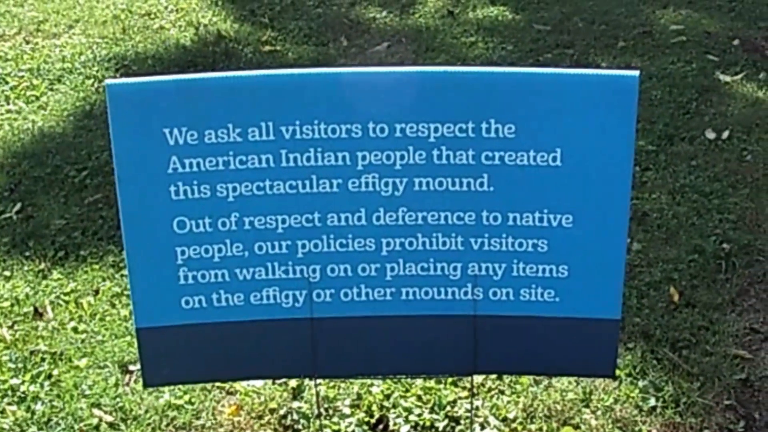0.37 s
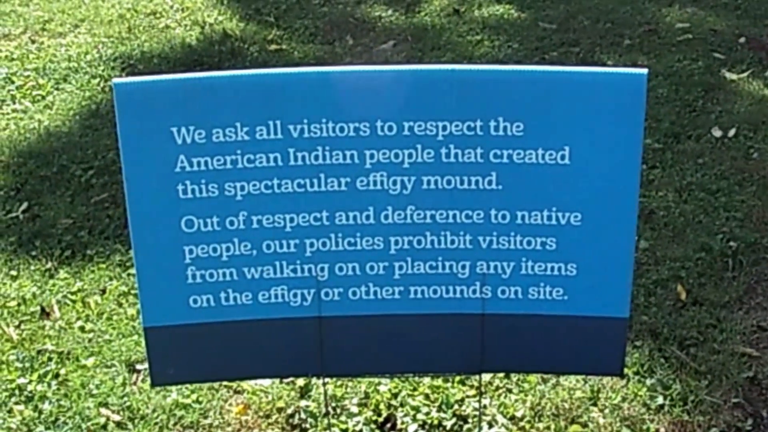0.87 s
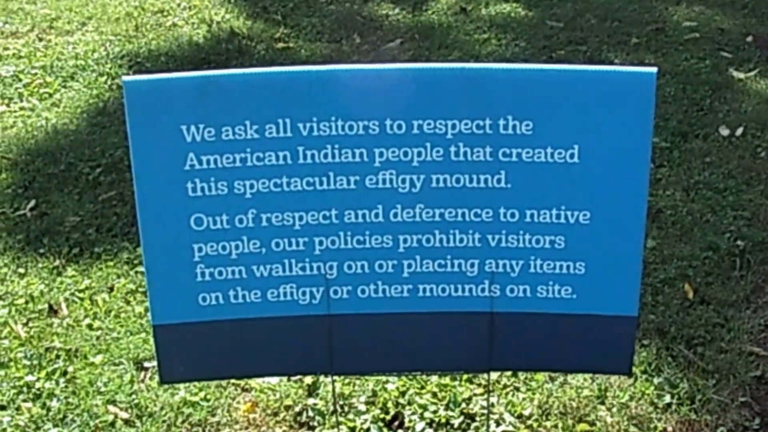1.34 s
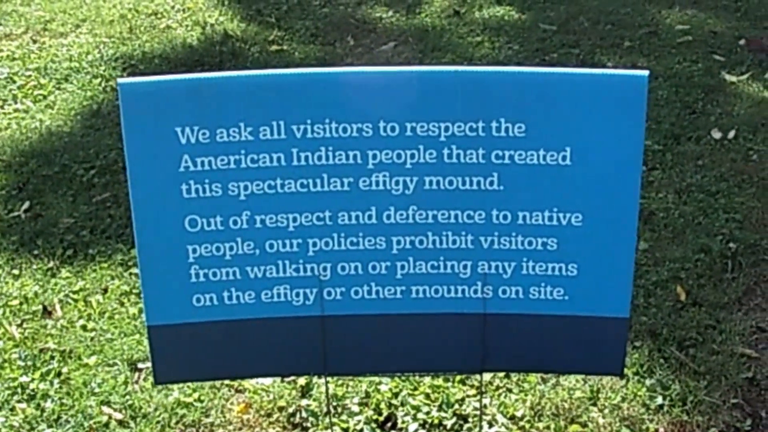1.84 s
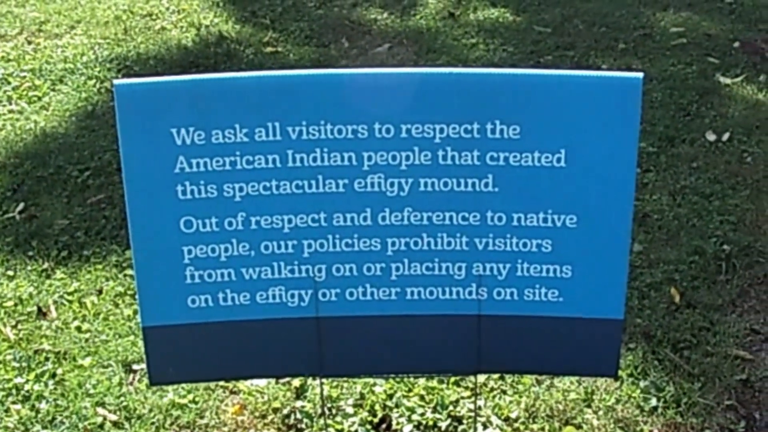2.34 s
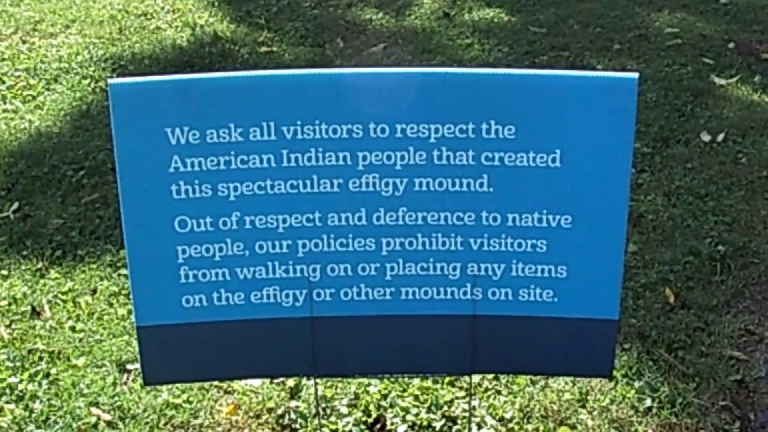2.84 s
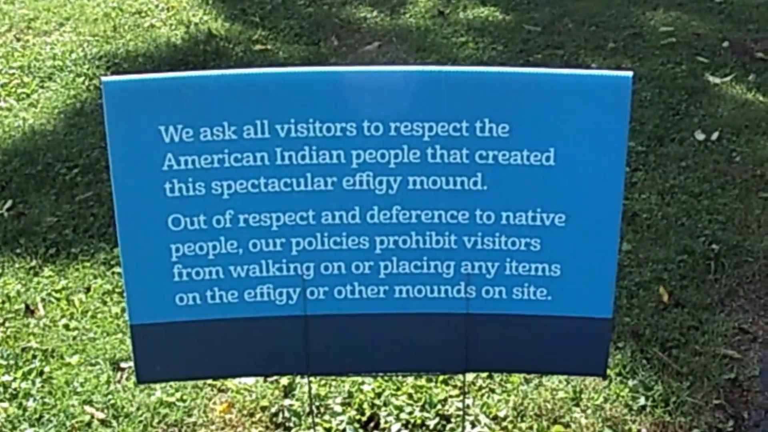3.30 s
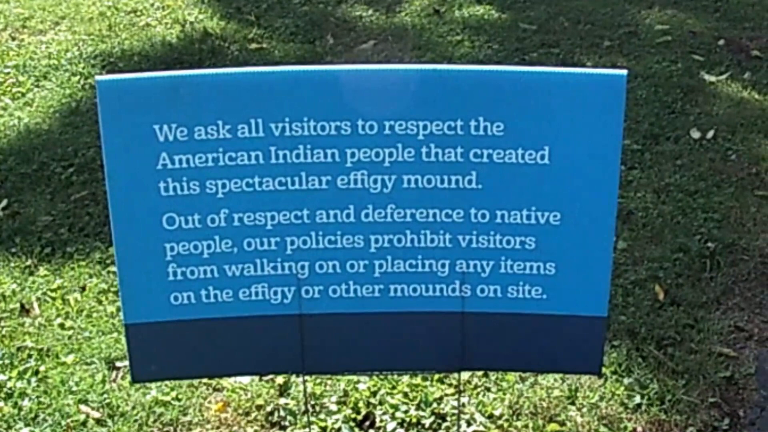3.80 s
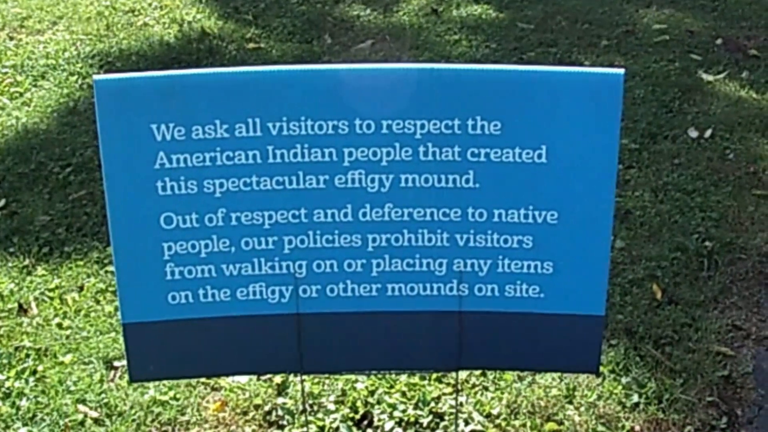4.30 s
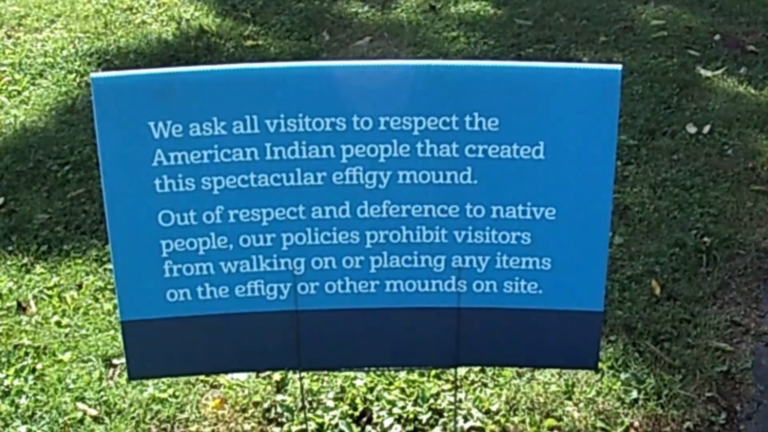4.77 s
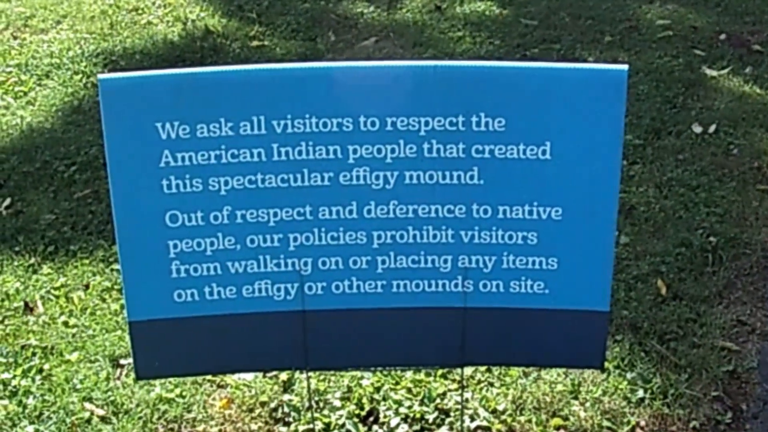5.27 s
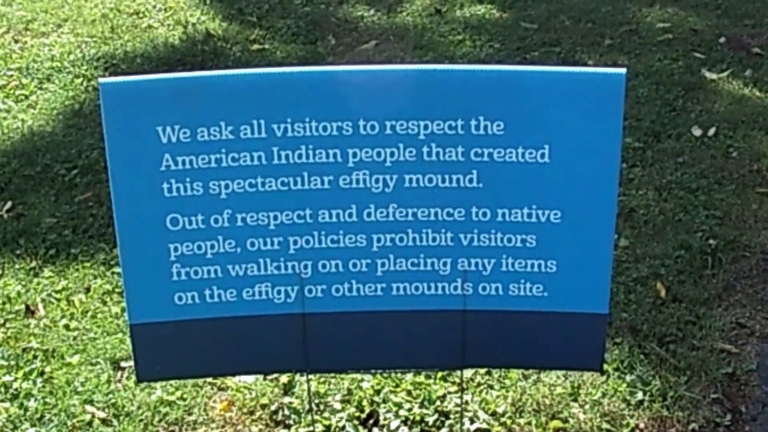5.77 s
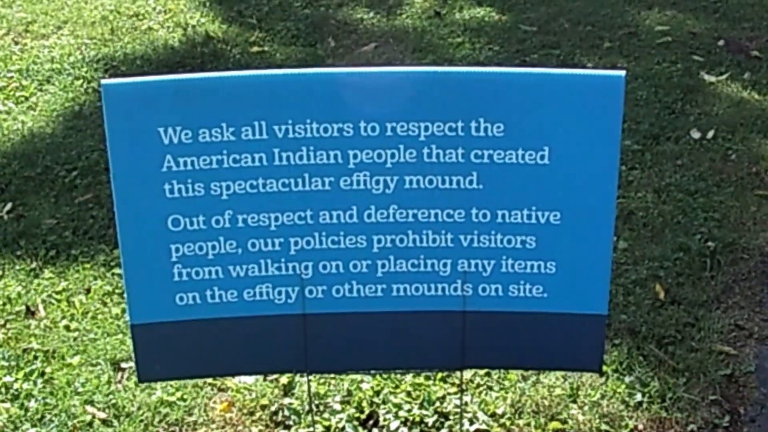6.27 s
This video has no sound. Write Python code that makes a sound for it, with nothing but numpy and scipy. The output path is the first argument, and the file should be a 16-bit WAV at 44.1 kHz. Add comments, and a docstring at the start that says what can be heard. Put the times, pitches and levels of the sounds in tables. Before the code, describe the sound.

Outdoors on a lawn, a few near crickets trill continuously around 6 to 7 kilohertz, over a blurred chorus of many far singers. A faint fast buzz rasps during the first second. Tiny dry grass crunches come midway, strongest just before four seconds. A distant hoarse bird calls faintly; a katydid rasps late. Practically mono, quiet, close to the grass.

```python
"""Ground crickets in a lawn

A few near crickets, each a train of short arched tones on its own beat, stand out of a slurred far chorus.
Two high raspers, made of filtered noise: an even fast buzz at the start, later a katydid's paired strokes.
A far bird calls in hoarse sagging overtones; grass crunches and twigs knock as snaps through resonances.
Beneath lie coloured noises: meadow sizzle, leaves, rumble, light wind and a thin top hiss.
Both sides carry one sound up to 12 kHz; all treble above 12 kHz is louder on the left."""
import sys
import numpy as np
from scipy import signal
from scipy.fft import rfft, irfft, next_fast_len
from scipy.io import wavfile

SR = 44100
rng = np.random.default_rng(int(sys.argv[2]) if len(sys.argv) > 2 else 0)


def output_pcm(signal):
    """Save a mono or channel-first signal as 16-bit PCM at the path in sys.argv[1].

    Samples are clipped to [-1, 1] before scaling.
    """
    pcm = np.clip(np.atleast_2d(signal).T, -1, 1) * 32767
    wavfile.write(sys.argv[1], SR, np.round(pcm).astype(np.int16))


def to_linear_factor(level_db):
    """Convert decibel levels (scalar or array-like) to linear amplitude factors."""
    exponent = np.asarray(level_db, float) / 20
    return 10 ** exponent


N = 281358
T = np.arange(N) / SR  # time [s]


def evened(x):
    """Scales a sound to rms 1."""
    return x / np.sqrt(np.mean(x ** 2) + 1e-20)


def over_time(points):
    """Reads (time, level) points as a continuous level in dB."""
    return np.interp(T, *np.transpose(points))


def coloured(x, spectrum):
    """Shapes a sound by (frequency, level) points, joined along log frequency."""
    hz, db = np.transpose(spectrum)
    size = next_fast_len(N)
    log_hz = np.log(np.fft.rfftfreq(size, 1 / SR) + 1)
    gain = to_linear_factor(np.interp(log_hz, np.log(hz + 1), db))
    return irfft(rfft(x, size) * gain, size)[..., :N]


def drift(per_s):
    """Slow random wander of rms 1: random knots joined by straight lines."""
    knots = rng.standard_normal(500)
    return evened(np.interp(T * per_s, np.arange(500), knots))


def resonate(x, hz, width):
    """A single resonance with gain 1 at its peak; pitch and bandwidth in Hz."""
    return signal.lfilter(*signal.iirpeak(min(hz, SR / 2.2), hz / width, SR), x)


def scattered(x, t60, wet_db):
    """Grass, trunks and ground return a short diffuse tail: noise that fades 60 dB in t60 seconds."""
    t = np.arange(SR // 2) / SR
    tail = rng.standard_normal(len(t)) * to_linear_factor(-60 * t / t60) * (t > .003)
    tail /= np.linalg.norm(tail)
    return x + to_linear_factor(wet_db) * signal.fftconvolve(x, tail)[:N]


def cricket(beat, voice, uneven_db):
    """Each wing stroke is a short tone whose pitch rises, then falls in an arch."""
    s, per_s, change, top_hz = beat
    arch_hz, stroke_s, db, swell_db = voice
    turns = per_s * (T - s) + change / 2 * (T - s) ** 2
    which = np.round(turns).astype(int)
    u = np.clip((turns - which) / per_s / stroke_s * 2, -1, 1)  # -1 to 1 across a stroke
    size, detune = rng.standard_normal((2, 400))
    start_phase = rng.random(400)
    pitch = top_hz + 15 * detune[which] - arch_hz * (u + .1) ** 2
    tone = np.sin(2 * np.pi * (np.cumsum(pitch) / SR + start_phase[which]))
    envelope = (1 - u ** 2) ** 0.84 * (1 + 0.32 * u)  # swells slowly, stops fast
    strokes = evened(tone * envelope * to_linear_factor(uneven_db * size[which]))
    return strokes * to_linear_factor(db + swell_db * (T / T[-1] - .5))


# Beat of each near cricket:
# (time of one wing stroke [s], strokes per second [1/s], change of that rate [1/s per s], top pitch [Hz])
NEAR_BEATS = [(3.2049, 30.806, -.015, 6265), (3.1900, 28.800, -.025, 6530), (3.1860, 29.443, .034, 6440),
              (3.1795, 31.612, 0, 6690), (3.2820, 4.924, 0, 6735), (3.1962, 42.77, 0, 7380),
              (3.1880, 56.21, 0, 7810), (3.2130, 26.10, 0, 5870)]
# Strokes of the same crickets:
# (depth of pitch arch [Hz], stroke length [s], level [dB], swell from start to end [dB])
NEAR_VOICES = [(280.4, .019, -53, 7), (230.3, .016, -58, 9), (148, 0.016, -56, -2),
               (80.5, 0.011, -59.5, 7.5), (108.4, .044, -59, -3), (174.4, 0.0041, -61, 2.5),
               (85.9, 0.011, -63, 3), (153.4, 0.017, -67.5, 5)]


def near_crickets():
    """The singers close by, each with its own steady beat, in a faint diffuse tail."""
    singers = sum(cricket(beat, voice, uneven_db=1.05) for beat, voice in zip(NEAR_BEATS, NEAR_VOICES))
    return scattered(singers, .35, wet_db=-16)


# Loudness of the far chorus: (time [s], level [dB])
CHORUS_LEVEL = [(0.0, -53), (0.6, -50.5), (1.9, -49), (4.0, -49.5), (6.38, -51.5)]
# Tone balance of the far singers by pitch: (frequency [Hz], relative level [dB])
CHORUS_COLOUR = [(3290, -28), (5600, -15.5), (5950, -7.5), (6070, -3.5), (6450, 3.5), (6750, -6),
                 (7010, -9), (7630, -9.5), (8040, -8.5), (8700, -19.5), (11300, -55), (19100, -120)]


def far_chorus():
    """64 far singers blurred by distance: strokes longer than their beat slur into wavering tones."""
    crowd = 0
    for hz in np.linspace(5500, 8800, num=64):
        s, faster, higher = rng.random(3)
        beat = (s, 25 + 38 * faster, 0, hz + 40 * higher)
        crowd = crowd + cricket(beat, (99.48, .08, 0, 0), uneven_db=2.5)
    crowd = evened(coloured(scattered(crowd, 0.1, wet_db=-2.5), CHORUS_COLOUR))
    return crowd * to_linear_factor(over_time(CHORUS_LEVEL))


# Bursts of the two raspers, the buzz first, then the katydid:
# (first stroke [s], end [s], stroke pairs per second [1/s], stroke spread [s])
RASP_BURSTS = [(.073, 1.19, 11.45, .015), (5.010, 5.43, 12.35, .006), (5.566, 6.38, 12.67, .007)]
# Levels of the same bursts:
# (rasp level [dB], second stroke of a pair against the first [dB], dull ring against first stroke [dB])
RASP_LEVELS = [(-73, -1.5, -7), (-79, -14, -5), (-70, -10, -1)]
# Colour of the rasp: (frequency [Hz], relative level [dB])
RASP_COLOUR = [(9000, -10), (10800, 4), (12000, -0.5), (14000, -0.5), (15300, 3), (16500, -19)]


def raspers():
    """Strokes of rasping noise over a dull ring: nearly even in the buzz, strong and weak in the katydid."""
    noise, out = rng.standard_normal((2, N)), np.zeros((2, N))
    teeth = evened(coloured(noise, RASP_COLOUR))
    dull = evened(resonate(resonate(noise, 9700, 1800), 9700, 1800))
    for (first, last, per_s, stroke), (db, weak_db, dull_db) in zip(RASP_BURSTS, RASP_LEVELS):
        turns = (T - first) * per_s
        on = (T > first - stroke * 2) & (T < last)
        spread = stroke * per_s
        strong = np.exp(-.5 * ((turns + .5) % 1 - .5) ** 2 / spread ** 2)
        weak = np.exp(-.5 * (turns % 1 - .5) ** 2 / spread ** 2)  # half a turn later
        rasp = (strong + to_linear_factor(weak_db) * weak) * teeth
        ring = to_linear_factor(dull_db) * (strong + weak) * dull
        out += to_linear_factor(db) * on * (rasp + ring)
    return out


# Far bird calls: (start [s], level before the fade [dB])
BIRD_CALLS = [(.96, -71.5), (3.385, -71), (6.275, -69)]
# Its overtones: (multiple of the pitch [1], level at the start [dB], change [dB per s])
BIRD_OVERTONES = [(2, -10, -60), (3, 2, -120), (4, 0, 0)]


def bird():
    """A hoarse stack of overtones whose pitch holds, then sags; a wall of trees returns it late."""
    call_s, rise_s, hold_s = .32, .03, .13
    top_hz, lowest_hz, sag_hz_per_s = 882, 800, 900
    calls = np.zeros(N)
    unsteady = 1 + .0025 * drift(70.0)
    hoarse = to_linear_factor(2.4 * drift(50.0))
    for start, call_db in BIRD_CALLS:
        t = np.clip(T - start, 0, call_s)
        hz = np.clip(top_hz - sag_hz_per_s * (t - hold_s), lowest_hz, top_hz)
        phase = 2 * np.pi * np.cumsum(hz * unsteady) / SR
        stack = sum(to_linear_factor(db + fade_db * t) * np.sin(k * phase) for k, db, fade_db in BIRD_OVERTONES)
        edges = np.minimum(np.minimum(t, call_s - t) / rise_s, 1)
        calls += stack * hoarse * edges * to_linear_factor(call_db - 14 * (t / call_s) ** 2)
    echo = np.pad(calls, (round(.1 * SR), 0))[:N]
    return scattered(calls + to_linear_factor(-2) * echo, .25, wet_db=-4)


# Wide crunches of dry grass:
# (peak time [s], ring drive [dB], middle [Hz], blade rustle drive [dB], rise and fade time [s])
GRASS_CRUNCHES = [(0.598, -76, 1500, -62, 0.016), (1.548, -68.5, 2940, -73, 0.027),
                  (2.236, -69.5, 4000, -65, .029), (2.54, -70, 3680, -55.5, 0.012),
                  (2.565, -57.5, 3460, -63.5, 0.031), (2.568, -62.5, 880, -60, 0.019),
                  (2.922, -61.5, 850, -78, 0.013), (2.926, -65, 2000, -65, 0.033),
                  (3.573, -67, 2180, -78, 0.061), (3.889, -63.5, 815, -73, 0.026),
                  (3.901, -59.5, 171, -80, 0.02), (3.892, -58, 3500, -61, 0.012),
                  (3.928, -50, 3000, -50.5, 0.022), (3.949, -57.5, 1440, -55, 0.0088),
                  (4.042, -66.5, 1760, -62, 0.065), (4.122, -59.5, 1500, -70, 0.0012),
                  (4.132, -62.5, 2920, -52.5, 0.008), (4.586, -80, 4000, -65, .006),
                  (4.743, -63.5, 3660, -58, .0051), (4.810, -69, 4000, -59.5, .008)]
# Pitched knocks and scrapes, as of twigs:
# (peak time [s], ring drive [dB], ring pitch [Hz], rise and fade time [s])
TWIG_KNOCKS = [(1.495, -76.5, 1720, .059), (1.953, -70.5, 1710, 0.021), (2.042, -73, 1600, 0.019),
               (2.64, -69.5, 1450, 0.043), (3.500, -74.5, 1550, 0.068), (4.358, -58.5, 5000, 0.011)]
# Colour of rustling dry blades: (frequency [Hz], relative level [dB])
BLADE_COLOUR = [(4000, -23), (6000, 7), (8500, 4), (10000, 3), (11200, -8.5), (14000, -19), (16000, -25)]


def crunches():
    """Clumps of small snaps: each rings stalks or twigs of its own size and rustles the dry blades."""
    snap_now = rng.random(N) < 1500 / SR  # 1500 snaps per second on average
    sizes = .4 + snap_now * to_linear_factor(2 + 3 * np.minimum(rng.exponential(1, N), 1.5))
    snaps = evened(rng.standard_normal((2, N)) * sizes)
    out, blades = np.zeros((2, N)), np.zeros(N)
    # ring widths are shares of the pitch; knocks rustle 5 dB under their ring drive
    wide = [(s, db, hz, 1.13 * hz, rustle_db, length) for s, db, hz, rustle_db, length in GRASS_CRUNCHES]
    narrow = [(s, db, hz, 0.25 * hz, db - 5, length) for s, db, hz, length in TWIG_KNOCKS]
    for s, db, hz, width, rustle_db, length in wide + narrow:
        near = slice(round((s - .2) * SR), round((s + .2) * SR))
        late = (T[near] - s) / length
        shape = np.exp(-np.where(late < 0, late ** 2, late))  # a soft swell, an even fade
        scrape = resonate(snaps[:, near] * shape, hz, width)
        ring = .6 * resonate(scrape, hz, width) + .4 * scrape
        out[:, near] += ring * to_linear_factor(db) / np.sqrt(width / SR)  # narrow rings are made up in level
        blades[near] += shape * to_linear_factor(rustle_db)
    return out + coloured(snaps * blades, BLADE_COLOUR) * 2


def noise_bed(spectrum, db, gust_db):
    """Coloured noise, separate on each side, whose level wanders by gust_db rms around db."""
    noise = evened(coloured(rng.standard_normal((2, N)), spectrum))
    return noise * to_linear_factor(db + gust_db * drift(8.0))


# Meadow sizzle: (frequency [Hz], relative level [dB])
MEADOW_COLOUR = [(2000, -55), (3000, -22), (3800, -12), (4200, -6), (5400, -4), (6500, 2), (8600, -11),
                 (9600, -10), (10800, -17.5), (11500, -22.5), (13100, -21.5), (13700, -40), (15000, -61)]


def meadow():
    """The steady sizzle of the meadow: treble noise that barely wanders."""
    return noise_bed(MEADOW_COLOUR, -60, gust_db=.5)


# Breeze, as the level of the leaves: (time [s], level [dB])
BREEZE_LEVEL = [(0.0, -88.5), (1.0, -74.5), (1.2, -73), (1.6, -76), (2.3, -73.5), (3.0, -72.5), (4.0, -69),
                (4.7, -71.5), (6.38, -68)]
# Leaf hiss: (frequency [Hz], relative level [dB])
LEAF_COLOUR = [(1200, -67), (1800, -21.5), (2400, -3), (3300, 3), (3900, 0), (5000, -16), (7000, -30),
               (9000, -60)]


def leaves():
    """Leaves hiss more as the breeze rises: noise that follows its level."""
    return noise_bed(LEAF_COLOUR, over_time(BREEZE_LEVEL), gust_db=.8)


# Far rumble: (frequency [Hz], relative level [dB])
RUMBLE_COLOUR = [(12, -29), (20, -7.5), (60, 4), (109, -6.5), (174, -2.5), (276, -13.5), (477, -19),
                 (572, -18), (759, -11), (1030, -18.5), (1310, -18), (1920, -21.5), (2500, -25),
                 (3250, -59), (5500, -120)]


def rumble():
    """Far low noise, around -67 dB at the strongest breeze, that follows it by 0.17 dB per dB."""
    breeze_db = over_time(BREEZE_LEVEL)
    return noise_bed(RUMBLE_COLOUR, -67 + 0.17 * (breeze_db - breeze_db.max()), gust_db=1.1)


# Wind: (frequency [Hz], relative level [dB])
WIND_COLOUR = [(10, -5), (25, -4), (65, 3), (110, -11), (250, -21), (500, -66)]


def wind():
    """Light wind: bass noise that comes in lumps."""
    return noise_bed(WIND_COLOUR, -74.5, gust_db=4.5)


# Loudness of the top hiss: (time [s], level [dB])
TOP_LEVEL = [(0.0, -85), (3.9, -81), (4.15, -97), (4.6, -99), (5.6, -93), (6.38, -87)]
# Top hiss: (frequency [Hz], relative level [dB])
TOP_COLOUR = [(10000, -60), (12300, -20), (13000, -1.5), (14300, -5), (15600, -6), (16500, -28)]


def top_hiss():
    """A thin hiss on top: noise in the highest treble that comes and goes."""
    return noise_bed(TOP_COLOUR, over_time(TOP_LEVEL), gust_db=.8)


def scene():
    """Crickets and bird reach both sides alike; the noisy layers differ between them."""
    singers = near_crickets() + far_chorus() + bird()
    background = meadow() + leaves() + rumble() + wind() + top_hiss()
    return singers + raspers() + crunches() + background


def band_limit(x):
    """A steep low-pass at the top of the band."""
    return signal.sosfilt(signal.butter(12, 15640, fs=SR, output="sos"), x)


def record(dry):
    """Both sides carry one signal; only the treble above 12 kHz differs, louder on the left."""
    low = signal.oaconvolve(dry, signal.firwin(511, 12000, fs=SR)[None], "same")
    top = dry - low
    left_top = top[0] * to_linear_factor(2.5)
    right_top = (0.3 * top[0] + 1.04 * top[1]) * to_linear_factor(-2.0)
    mix = low[0] + np.array([left_top, right_top])
    return band_limit(mix)


dry = scene()
out = record(dry)
output_pcm(out)
```